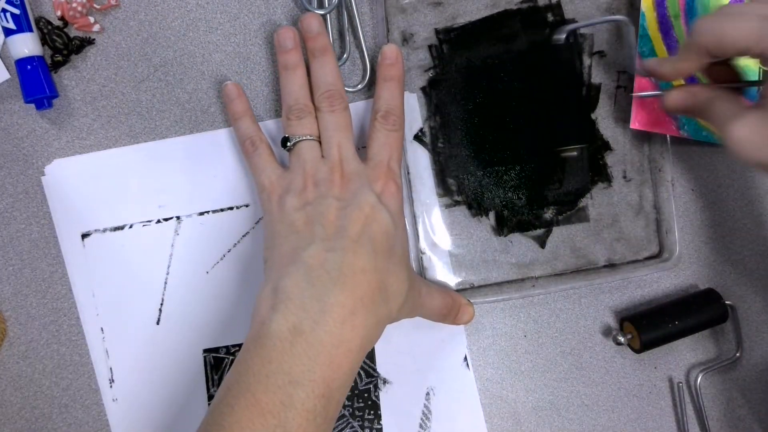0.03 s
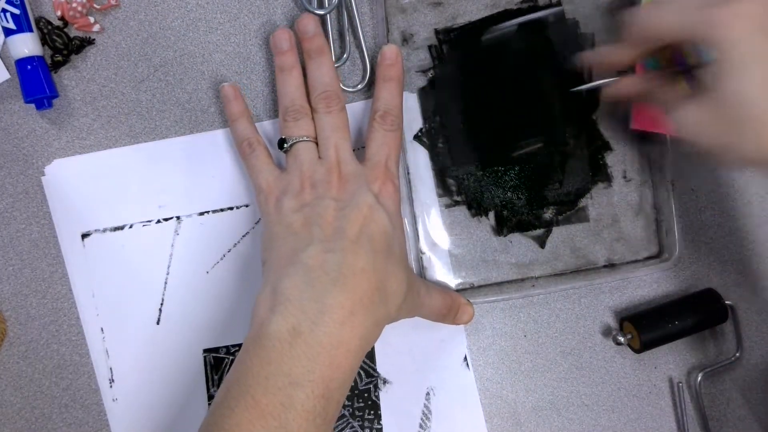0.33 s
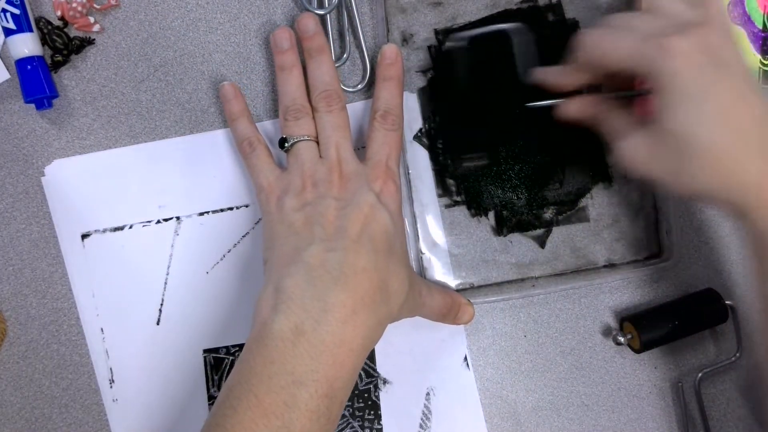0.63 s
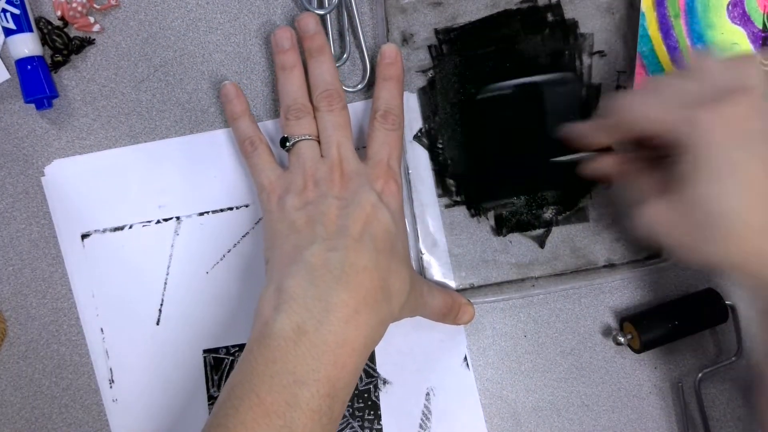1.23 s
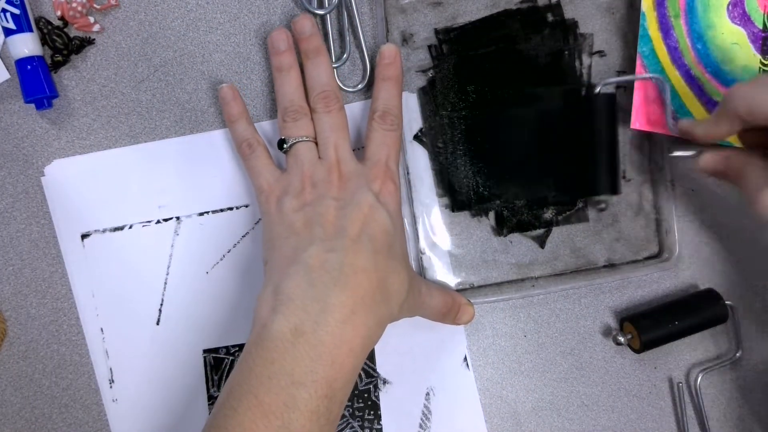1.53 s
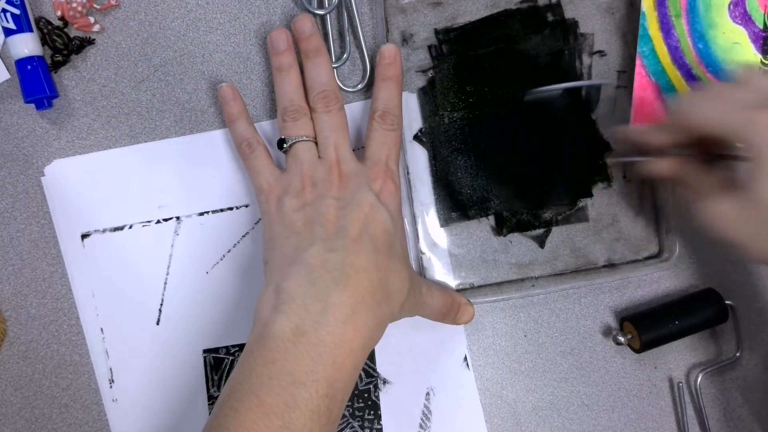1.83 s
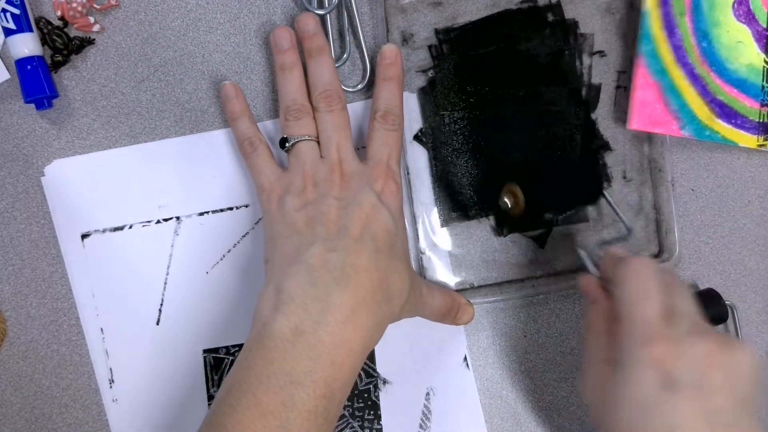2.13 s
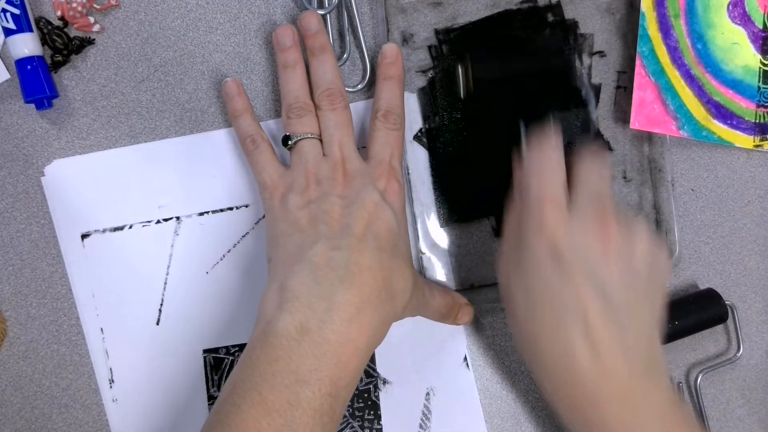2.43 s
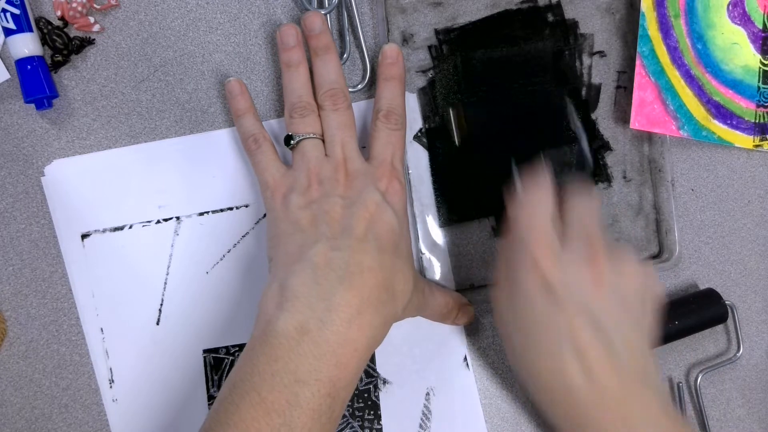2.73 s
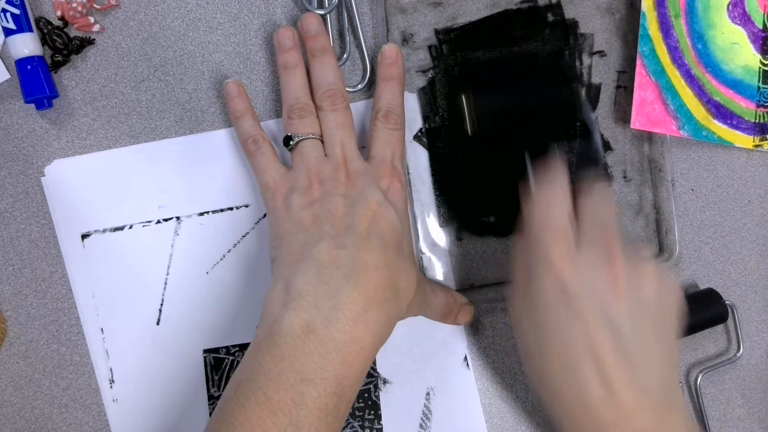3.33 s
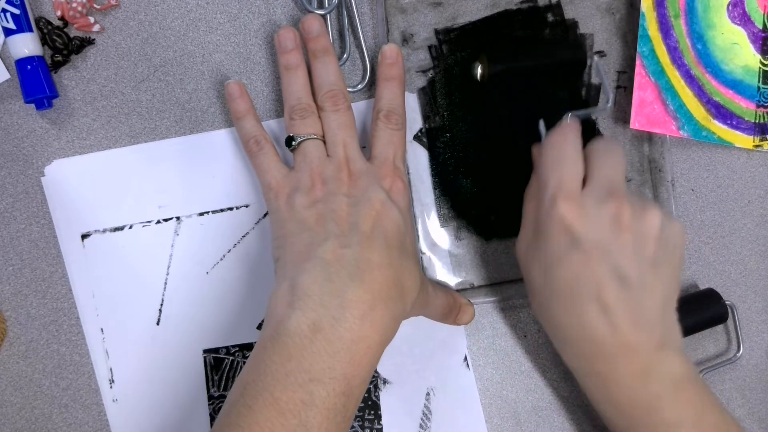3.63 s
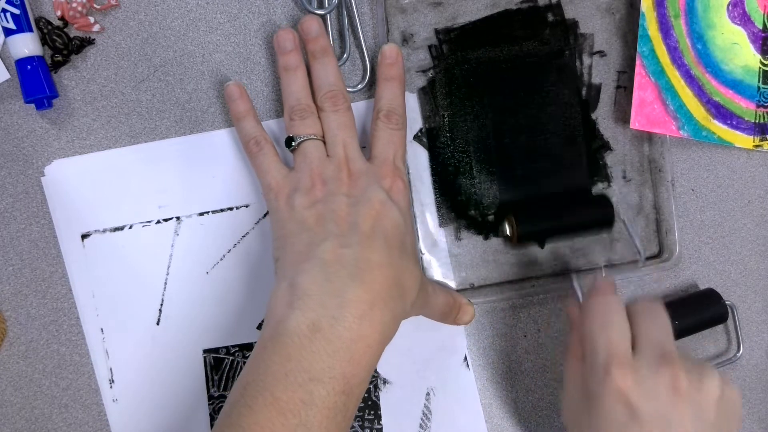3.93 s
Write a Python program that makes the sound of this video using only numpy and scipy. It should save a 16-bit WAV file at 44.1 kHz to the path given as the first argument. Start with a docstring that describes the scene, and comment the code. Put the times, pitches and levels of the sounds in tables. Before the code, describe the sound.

A hand roller rolls back and forth through tacky ink, sizzling, rumbling and squeaking.

```python
"""Ink roller on a plate, close up.

A rubber hand roller is pushed back and forth through tacky ink on a plate, on a table in a small
furnished room, one microphone close by. In each stroke the ink film tears with a fine sizzle and the
roller rumbles, knocks and chatters on the plate, while its dry axle chirps in the wire frame.
Halfway the roller is lifted, turned and set down with a double clack."""
import sys
import numpy as np
from scipy import signal
from scipy.fft import rfft, irfft, next_fast_len
from scipy.io import wavfile
from scipy.ndimage import uniform_filter1d, map_coordinates

SR = 44100
rng = np.random.default_rng(int(sys.argv[2]) if len(sys.argv) > 2 else 0)


def output_pcm(signal):
    """Save a mono or channel-first signal as 16-bit PCM at the path in sys.argv[1].

    Samples are clipped to [-1, 1] before scaling.
    """
    pcm = np.clip(np.atleast_2d(signal).T, -1, 1) * 32767
    wavfile.write(sys.argv[1], SR, np.round(pcm).astype(np.int16))


N = 176400


def amp(db):
    """Decibels to gain."""
    return 10 ** (np.asarray(db) / 20)


def unit(x):
    """Scale to rms 1."""
    return x / np.sqrt(np.mean(x ** 2) + 1e-20)


def add(track, s, sound):
    """Mix a sound into the track at time s."""
    i = int(round(s * SR))
    part = sound[max(-i, 0):max(N - i, 0)]
    track[max(i, 0):max(i, 0) + len(part)] += part


def filtered(x, response):
    """Filter x by a complex response of frequency."""
    m = next_fast_len(len(x) + SR // 4)
    return irfft(rfft(x, m) * response(np.fft.rfftfreq(m, 1 / SR)), m)[:len(x)]


def colour(x, points):
    """Shape x by (frequency [Hz], level [dB]) points on a log axis."""
    f, db = np.transpose(points)
    return filtered(x, lambda hz: amp(np.interp(np.log(hz + 1), np.log(f + 1), db)))


def ring(x, modes):
    """Pass x through a body's resonances, alternating in sign."""
    return filtered(x, lambda f: sum(
        (-1) ** k * amp(db) * 1j * f * width / (hz * hz - f * f + 1j * f * width)
        for k, (hz, width, db) in enumerate(modes)))


def blow(modes):
    """The ring of a body after one impulse."""
    return ring(signal.unit_impulse(SR // 4), modes)


def wobble(rate, size=N):
    """A smooth random curve, rate knots a second."""
    knots = rng.standard_normal(int(size * rate / SR) + 4)
    return map_coordinates(knots, [np.arange(size) * rate / SR])


def impacts(per_s, size=N):
    """Tiny impulses of random size at random moments."""
    return (rng.random(size) < per_s / SR) * rng.standard_normal(size)


def steady(x, window_s=0.035):
    """Bring x to a level of about 1 within every short window."""
    power = np.abs(uniform_filter1d(x ** 2, int(window_s * SR)))
    return x / np.sqrt(power + 1e-3 * np.mean(x ** 2))


# spectrum of the room tone (frequency [Hz], level [dB])
ROOM_TONE = [(15, -43), (25, 9), (194, 10.5), (812, 3), (981, -5), (1220, -3.5), (1870, -6.5), (2200, -6),
             (3050, -2), (3390, -3.5), (4450, -9), (11700, -11), (15800, -6.5)]
def room_tone():
    """The room's faint steady noise, far behind the roller."""
    return amp(-52) * unit(colour(rng.standard_normal(N), ROOM_TONE))


def room_answer(x, t60_s=0.21):
    """The small furnished room answers briefly, its treble dulled."""
    t = np.arange(SR // 2) / SR
    spectrum = [(200, 2.5), (700, 1.5), (1600, 0.0), (3000, -0.5), (12000, -11.5)]
    onset = 1 - np.exp(-t / 0.00031)
    tail = colour(rng.standard_normal(len(t)), spectrum) * amp(-60 * t / t60_s) * onset
    return signal.fftconvolve(x, tail / np.linalg.norm(tail))[:N]


# a slowly dying mode of the table (frequency [Hz], width [Hz], level [dB])
HUM_MODE = [(199.9, 7.7, -0.5)]
def table_hum(roller):
    """The table rings on beneath the plate as the roller keeps stirring it."""
    return ring(roller, HUM_MODE)


# low modes of the table (frequency [Hz], width [Hz], level [dB])
TABLE_MODES = [(120, 12, -10), (161, 7, 0), (205, 14, -10), (272, 24, -13)]
# heavy thuds (time [s], peak [dB])
THUDS = [(0.249, -19), (0.2854, -24), (0.3679, -32)]
def table_thuds(top_hz=514):
    """The roller's heaviest contacts shake the table."""
    out = np.zeros(N)
    thud = signal.sosfilt(signal.butter(2, top_hz, fs=SR, output="sos"), blow(TABLE_MODES))
    for s, db in THUDS:
        add(out, s, amp(db) * thud / np.abs(thud).max())
    return out


# modes of the inked plate (frequency [Hz], width [Hz], level [dB])
PLATE_MODES = [(170, 75, -11.5), (207.1, 30, 0), (232, 49.4, 0), (277.8, 39.6, 0.5), (363.5, 39.4, -3.5),
               (471, 33, -3.5), (537, 200, -12), (674, 23, 1), (801, 20, -14), (931, 22, -8),
               (1108, 22, -3), (1359, 52, -7.5), (1557, 125, -6.5), (1790, 75, -12)]
def plate_at(favoured_hz, lift_db, octaves):
    """The plate's modes as one spot drives them: those near the favoured pitch are lifted."""
    return [(hz, width, db + lift_db * np.exp(-(np.log2(hz / favoured_hz) / octaves) ** 2))
            for hz, width, db in PLATE_MODES]


# spectrum of a soft contact (frequency [Hz], level [dB])
KNOCK_COLOUR = [(30, -7), (100, -5), (180, -1.5), (270, 0.5), (350, 1.5), (460, -3.5), (670, -10),
                (1100, -14), (1700, -36), (3000, -35)]
# knocks on the plate (time [s], peak [dB], pitch favoured by the spot [Hz])
KNOCKS = [(0.068, -30, 262), (0.127, -30, 328), (.175, -25.5, 288), (.547, -31.5, 298), (0.696, -37, 330),
          (0.73, -39, 300), (.843, -26, 253), (1.199, -25.5, 340), (1.21, -30.5, 217), (1.244, -29.5, 330),
          (1.43, -26.5, 258), (1.46, -23.5, 286), (1.602, -17.5, 314), (1.789, -26.5, 208),
          (1.802, -29, 273), (2.245, -29.5, 150), (2.312, -23, 318), (2.427, -34, 262), (2.5, -34.5, 198),
          (2.748, -30.5, 205), (2.907, -27, 333), (2.947, -34, 260), (2.993, -34.5, 246),
          (3.09, -32.5, 300), (2.851, -43.5, 330), (3.16, -26.5, 264), (3.56, -26.5, 263),
          (3.608, -25, 304), (3.763, -24.5, 261), (3.819, -28, 290), (3.857, -29, 262)]
def plate_knocks():
    """Soft rubber contacts ring the low modes of the plate, a little differently each time."""
    out = np.zeros(N)
    for s, db, favoured_hz in KNOCKS:
        spot = plate_at(favoured_hz, lift_db=9, octaves=0.38)
        modes = [(hz, width, level + rng.normal(0, 1.18)) for hz, width, level in spot]
        knock = colour(np.pad(blow(modes), (SR // 100, 0)), KNOCK_COLOUR)
        add(out, s - 0.012, amp(db) * knock / np.abs(knock).max())  # 10 ms of padding, 2 ms of lead
    return out


# spectrum of a hard contact (frequency [Hz], level [dB])
CHATTER_COLOUR = [(100, -12), (300, -1), (600, 7.5), (1100, 0), (1700, -5.5), (3000, 5), (6000, -34)]
# spells of chatter (peak time [s], half length [s], level [dB], pitch favoured by the spot [Hz])
CHATTERS = [(0.153, 0.041, -38.5, 594), (0.269, 0.0063, -29.5, 283), (0.529, 0.034, -43.5, 600),
            (0.721, 0.0061, -40, 880), (0.891, 0.037, -47, 744), (1.068, 0.0052, -41, 650),
            (1.242, 0.033, -41, 690), (1.465, 0.03, -39.5, 554), (1.618, 0.019, -26.5, 1260),
            (1.803, 0.016, -40, 634), (2.255, 0.01, -34, 1020), (2.325, 0.018, -40.5, 730),
            (2.851, 0.0053, -48, 650), (2.449, 0.0093, -43, 1300), (2.539, 0.022, -42.5, 610),
            (2.71, 0.0074, -38, 676), (2.921, 0.019, -38.5, 840), (3.099, 0.0121, -46, 1000),
            (3.182, 0.015, -38, 600), (3.386, 0.031, -42.5, 790), (3.526, 0.015, -45, 1100),
            (3.978, 0.012, -48.5, 650), (3.619, 0.013, -33.5, 730), (3.827, 0.018, -40.5, 940)]
def plate_chatter():
    """Quick hard contacts ring the upper modes of the plate, in a colour that depends on the spot."""
    out, t = np.zeros(N), np.arange(-SR // 5, SR // 5) / SR
    for s, half_s, db, favoured_hz in CHATTERS:
        spot = plate_at(favoured_hz, lift_db=6, octaves=0.74)
        rattle = ring(impacts(per_s=900, size=len(t)), spot)
        swell = amp(db) / (1 + (t / half_s) ** 2) ** 1.55
        add(out, s + t[0], swell * steady(colour(rattle, CHATTER_COLOUR)))
    return out


# ring of the struck frame (frequency [Hz], width [Hz], level [dB])
CLACK_MODES = [(131, 300, -1), (340, 58, 6), (674, 120, 2), (1114, 31, 1.5), (1346, 140, 1),
               (1680, 113, 5.5), (2420, 290, 3), (2935, 261, 7), (4000, 290, 3.5), (4970, 740, -3.5),
               (5478, 320, -2), (6000, 420, -8), (10200, 3000, -24.5)]
# clacks as the roller is turned (time [s], peak [dB], brightness [dB per octave])
CLACKS = [(1.906, -38, -5.5), (1.932, -31.5, -5.5), (2.105, -25.5, -11), (2.1103, -12.5, 0.5),
          (2.1207, -27.5, -6.5), (2.131, -12.5, -1.5), (2.1481, -25.5, -3), (2.2332, -32.5, -9)]
def frame_clacks(give_hz=52.3, give_t60_s=0.06):
    """The frame strikes and rebounds: a sharp crack, a brief scatter, and the table gives under it."""
    out, t = np.zeros(N), np.arange(SR // 8) / SR
    give = np.sin(2 * np.pi * give_hz * t) * amp(-20 - 60 * t / give_t60_s)
    for s, db, tilt_db in CLACKS:
        scatter = 0.11 * rng.standard_normal(len(t)) * amp(-60 * t / 0.023)
        crack = ring(signal.unit_impulse(len(t)) + scatter, CLACK_MODES)
        clack = filtered(crack, lambda hz: amp(tilt_db * np.log2(np.clip(hz, 1000, 8000) / 1000)))
        add(out, s, amp(db) * (clack / np.abs(clack).max() + give))
    return out


# modes of the wire frame (frequency [Hz], width [Hz], level [dB])
FRAME_MODES = [(1512, 40, -5), (2345, 296, -3.5), (2963, 148, 3), (3970, 384, 5), (4510, 1880, -1),
               (5446, 496, 4.5), (6230, 310, -14.5)]
# chirps and groans (start [s], length [s], first pitch [Hz], last pitch [Hz],
# fundamental [dB], overtones [dB], roughness [0-1])
CHIRPS = [(-.012, 0.034, 1674, 1580, -30, -43.5, 0.33), (0.081, 0.018, 1583, 1570, -32.5, -35.5, 0.34),
          (0.201, 0.014, 5560, 5650, -44, -75, 0.2), (0.374, 0.03, 1543, 1600, -30.5, -47.5, 0.09),
          (0.444, 0.015, 1760, 1660, -35, -48.5, 0.07), (0.458, 0.019, 1687, 1468, -33.5, -54, 0.11),
          (0.51, 0.033, 664, 623, -31, -72, 0.03), (0.511, 0.025, 1347, 1407, -55, -38.5, 0.8),
          (0.631, 0.11, 3082, 2489, -55.5, -71, 0.39), (0.712, 0.017, 1666, 1640, -42, -38, 0.48),
          (0.866, 0.035, 2180, 1890, -52, -45, 0.14), (1.044, 0.012, 1940, 1830, -44, -40, 0.3),
          (1.233, 0.036, 5690, 5640, -47.5, -75, 0.14), (1.279, 0.031, 2295, 2030, -52, -52.5, 0.26),
          (1.388, 0.021, 1995, 1796, -47, -42.5, 0.2), (1.458, 0.012, 1457, 1410, -67, -40, 0.35),
          (1.587, 0.021, 1388, 1454, -55, -33, 0.83), (1.662, 0.023, 2230, 1890, -46.5, -43, 0.21),
          (1.758, 0.013, 1770, 1720, -35.5, -35.5, 0.24), (2.267, 0.015, 5690, 5400, -31, -43, 0.43),
          (2.459, 0.0079, 1575, 1566, -46.5, -43, 0.06), (2.702, 0.018, 5350, 5420, -38, -44, 0.56),
          (2.987, 0.022, 2130, 2110, -56, -54, 0.31), (3.085, 0.0061, 3880, 3780, -55, -55, 0.58),
          (3.359, 0.01, 1586, 1514, -37.5, -38, 0.5), (3.594, 0.012, 1690, 1445, -30, -37, 0.49),
          (3.782, 0.017, 1593, 1597, -37.5, -38, 0.42)]
def axle_chirps(scatter_hz=250.6, overtone_step_db=-3.5):
    """The axle sticks and slips in short glides; the frame colours the overtones."""
    out = np.zeros(N)
    for start, length, first_hz, last_hz, db, overtones_db, rough in CHIRPS:
        size = int(length * SR)
        hz = np.linspace(first_hz, last_hz, size) + scatter_hz * rough * wobble(900, size)
        phase = 2 * np.pi * np.cumsum(hz) / SR
        overtones = sum(amp(overtone_step_db * k) * np.sin(k * phase)
                        for k in range(2, 5) if k * first_hz < SR / 2)
        grit = 6 * rough ** 2 * rng.standard_normal(size)
        rasp = amp(2 * wobble(1114, size))  # the slips are uneven
        upper = unit(ring((unit(overtones) + grit) * rasp, FRAME_MODES))
        arc = np.interp(np.linspace(0, 1, size), [0, 0.45, 1], [0, np.pi / 2, np.pi])
        swell = np.sin(arc) * amp(1.5 * wobble(300, size))
        add(out, start, swell * (amp(db) * np.sin(phase) * np.sqrt(2) + amp(overtones_db) * upper))
    return out


def axle_rub(level, crackle):
    """The dry axle rubs: a flickering crackle rings the wire frame."""
    rub = colour(ring(crackle, FRAME_MODES), [(6200, -12), (7200, -6)])
    return level * unit(rub) * amp(2.44 * wobble(110))


# spectrum of the rolling contact (frequency [Hz], level [dB])
ROLL_COLOUR = [(30, 7), (100, 3), (200, -2.5), (350, -5.5), (670, -15), (1100, -22.5), (1700, -22),
               (3000, -24)]
def plate_rumble(level):
    """Dense small bumps ring the plate, with the table's deep rumble underneath."""
    plate = steady(colour(ring(impacts(per_s=1500), PLATE_MODES), ROLL_COLOUR))
    deep = [(15, -6), (30, 13), (48, 9), (65, -6), (120, -17), (250, -67)]
    table = unit(colour(rng.standard_normal(N), deep))
    return level * (plate + amp(-17) * table)


# resonances of the sizzle (frequency [Hz], width [Hz], level [dB])
SIZZLE_MODES = [(5910, 530, -1), (7660, 82, -0.5), (8520, 120, -1.5), (9800, 310, -1), (11090, 290, 0.5),
                (11840, 180, -5.5), (13300, 970, -0.5), (15900, 2100, -1)]
# patches of ink that peel off at once (time [s], level [dB])
PEELS = [(.105, -55), (.285, -50.5), (.72, -53), (1.055, -58), (1.598, -59), (1.763, -50), (1.822, -59),
         (2.275, -56.5), (2.94, -52), (3.363, -56), (3.79, -53)]
def ink_sizzle(level, crackle, peel_half_s=0.011):
    """The ink film tears close to the microphone, flaring where a whole patch peels off the roller."""
    t = np.arange(N) / SR
    peels = sum(amp(db) * np.exp(-((t - s) / peel_half_s) ** 2) for s, db in PEELS)
    return (level + peels) * unit(ring(crackle, SIZZLE_MODES)) * amp(1.7 * wobble(170))


# strokes of the roller (start [s], end [s], ink sizzle [dB], axle rub [dB], rumble [dB],
# moment of greatest pressure [share of the stroke])
STROKES = [(0.056, 0.202, -52, -49.5, -33, 0.68), (0.249, 0.397, -53, -52, -34, 0.35),
           (0.439, 0.584, -54, -52, -37, 0.47), (0.588, 0.746, -50.5, -50.5, -34.5, 1),
           (0.816, 0.918, -58.5, -54.5, -38, 0.21), (1.027, 1.13, -54, -54, -37.5, 0.5),
           (1.158, 1.278, -57, -54, -41, 0.77), (1.379, 1.515, -51, -49.5, -35, 0.48),
           (1.552, 1.668, -51.5, -45.5, -35.5, 0.46), (1.713, 1.886, -53, -49.5, -33.5, 0.63),
           (2.23, 2.388, -53.5, -50, -38.5, .63), (2.417, 2.577, -50.5, -47.5, -37.5, 0.69),
           (2.65, 2.794, -50.5, -50.5, -38, .62), (2.846, 2.992, -51.5, -47, -38, 0.7),
           (3.14, 3.235, -50, -50, -35.5, .35), (3.264, 3.465, -51, -48.5, -36.5, 0.65),
           (3.485, 3.668, -49.5, -49.5, -32.5, .62), (3.696, 3.9, -52, -49.5, -37.5, 0.55),
           (3.93, 4.038, -51, -52.5, -41, 0.514)]
def rolling():
    """In each stroke, speed drives the ink sizzle and axle rub, and pressure drives the rumble."""
    t = np.arange(N) / SR
    sizzle, rub, rumble = np.zeros((3, N))
    for start, end, ink_db, rub_db, rumble_db, crest in STROKES:
        speed = np.abs(np.sin(np.pi * np.clip((t - start) / (end - start), 0, 1)))
        crest_s = start + np.clip(crest, 0.1, 0.9) * (end - start)
        pressure = np.interp(t, [start - 0.06, crest_s, end + 0.047], [0, 1, 0])
        sizzle += amp(ink_db) * speed ** 0.65
        rub += amp(rub_db) * speed ** 0.75
        rumble += amp(rumble_db) * pressure ** 2.08
    fine_tears = unit(impacts(per_s=11000))
    thread_snaps = amp(-6.5) * unit(impacts(per_s=400))
    crackle = fine_tears + thread_snaps
    return ink_sizzle(sizzle, crackle) + axle_rub(rub, crackle) + plate_rumble(rumble)


def scene():
    """In mono: the roller close by, the table beneath it, the room well behind."""
    roller = rolling() + plate_chatter() + plate_knocks() + table_thuds()
    roller += frame_clacks() + axle_chirps()
    direct = roller + table_hum(roller)
    return (direct + amp(-16) * room_answer(direct) + room_tone())[None]


def record(dry):
    """The microphone keeps nothing above 15.8 kHz."""
    return np.array([filtered(channel, lambda hz: hz < 15800) for channel in dry])


dry = scene()
out = record(dry)
output_pcm(out)
```